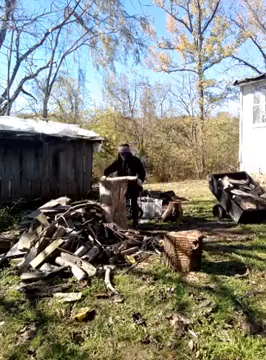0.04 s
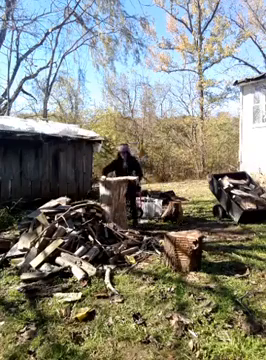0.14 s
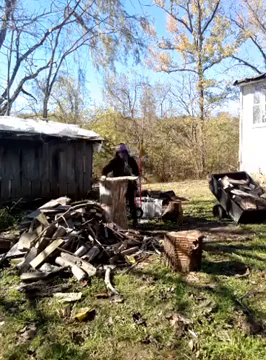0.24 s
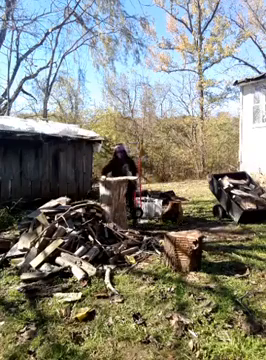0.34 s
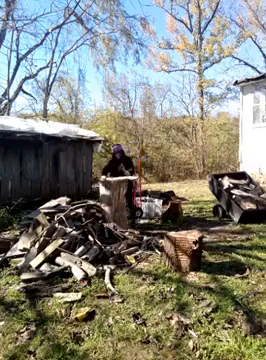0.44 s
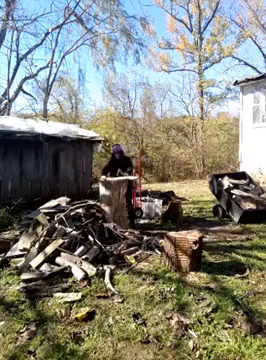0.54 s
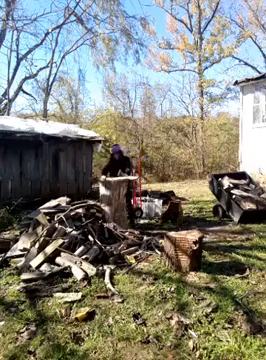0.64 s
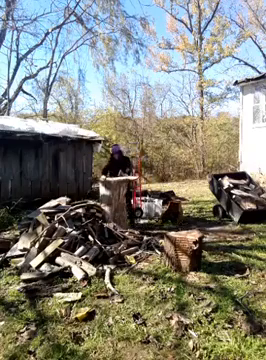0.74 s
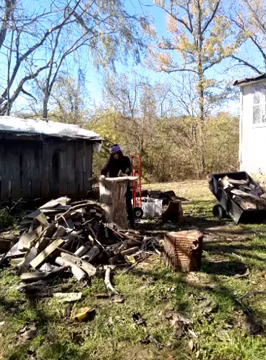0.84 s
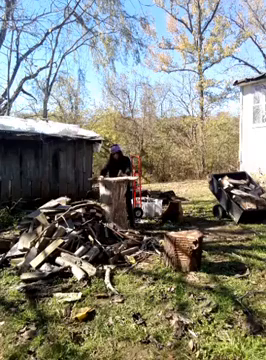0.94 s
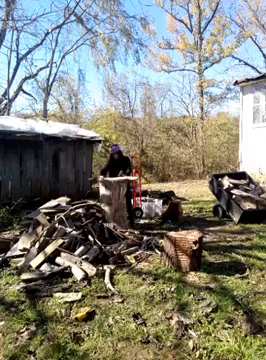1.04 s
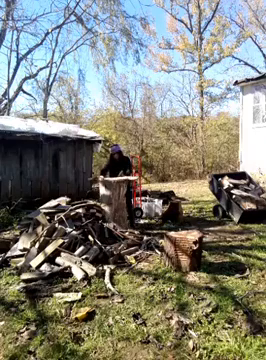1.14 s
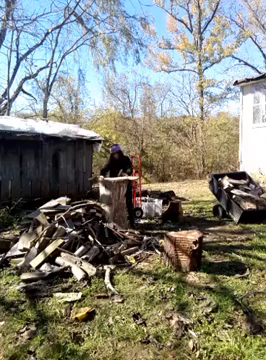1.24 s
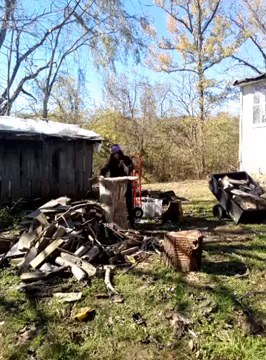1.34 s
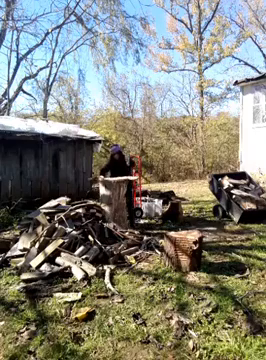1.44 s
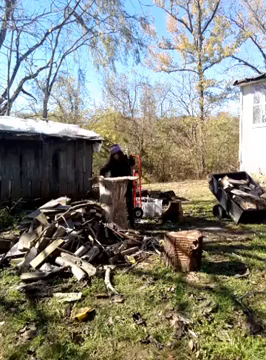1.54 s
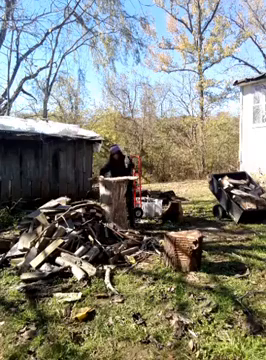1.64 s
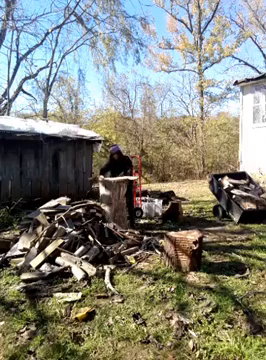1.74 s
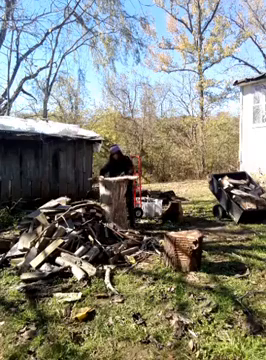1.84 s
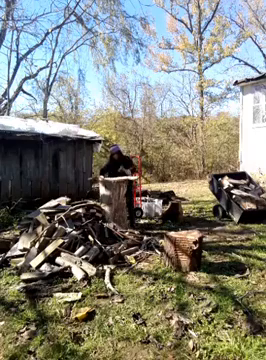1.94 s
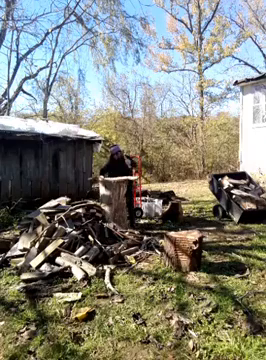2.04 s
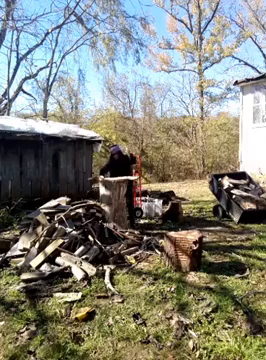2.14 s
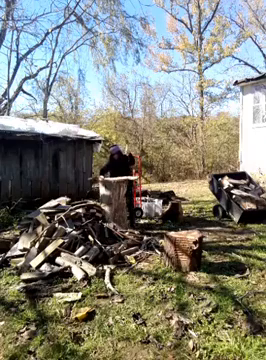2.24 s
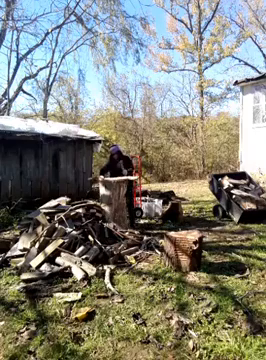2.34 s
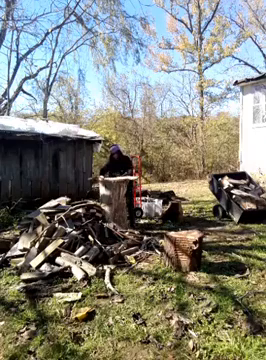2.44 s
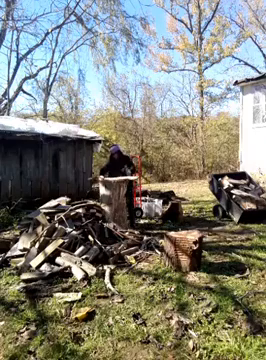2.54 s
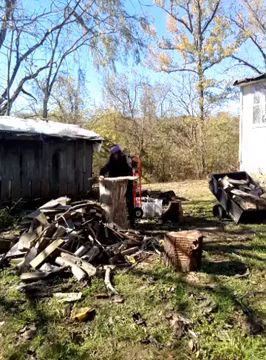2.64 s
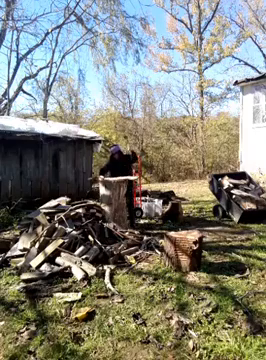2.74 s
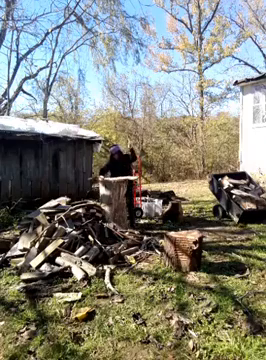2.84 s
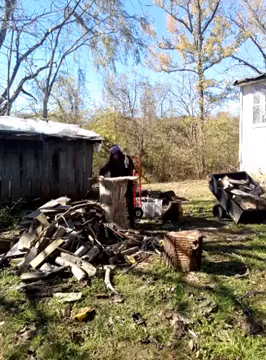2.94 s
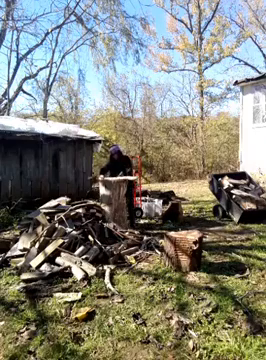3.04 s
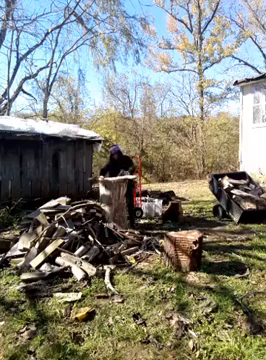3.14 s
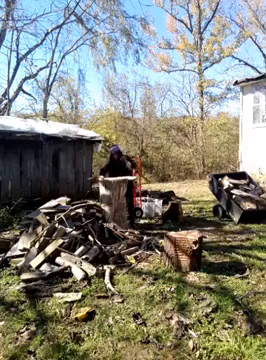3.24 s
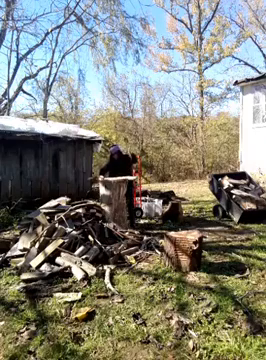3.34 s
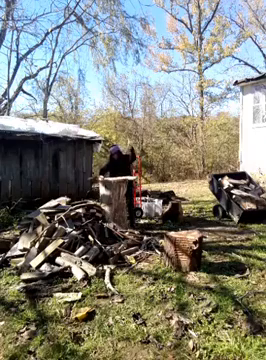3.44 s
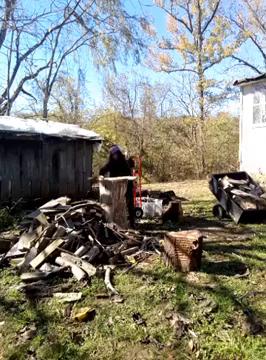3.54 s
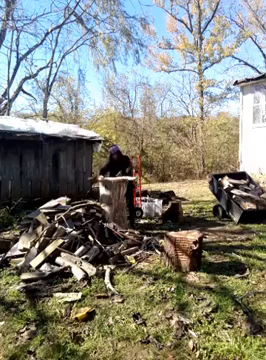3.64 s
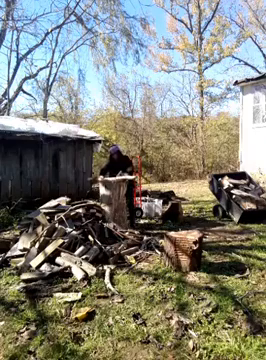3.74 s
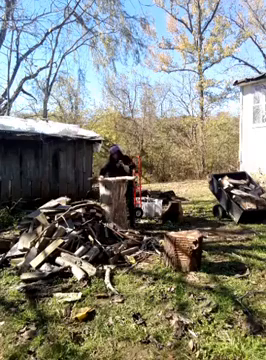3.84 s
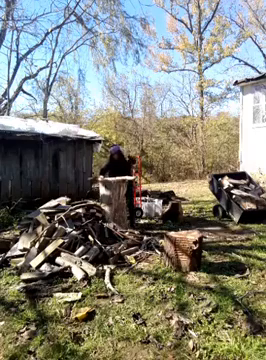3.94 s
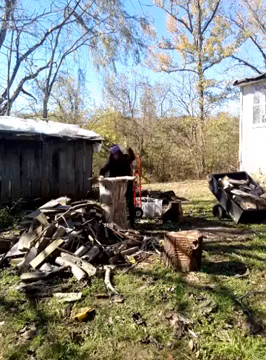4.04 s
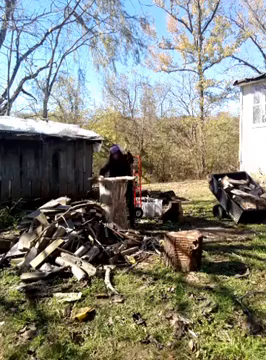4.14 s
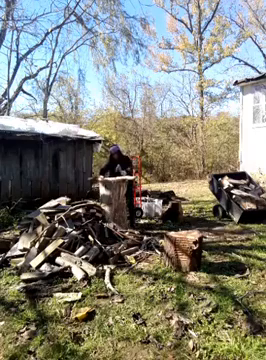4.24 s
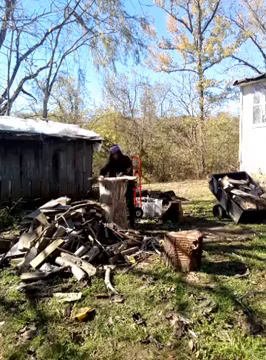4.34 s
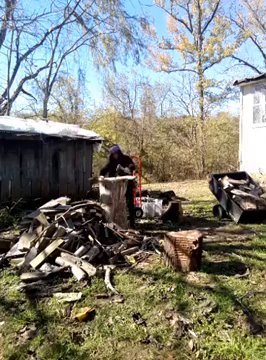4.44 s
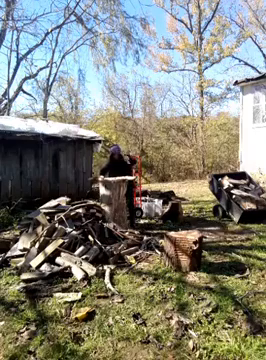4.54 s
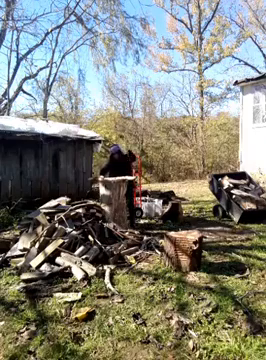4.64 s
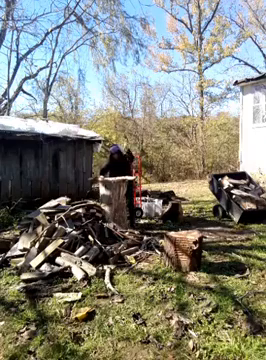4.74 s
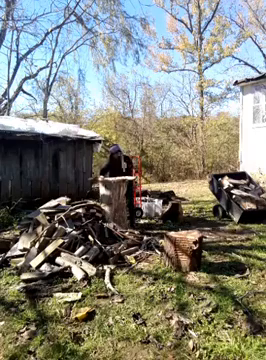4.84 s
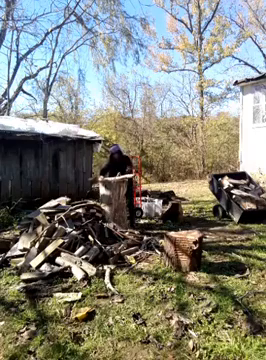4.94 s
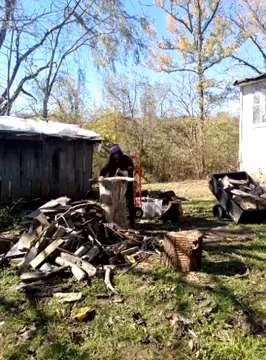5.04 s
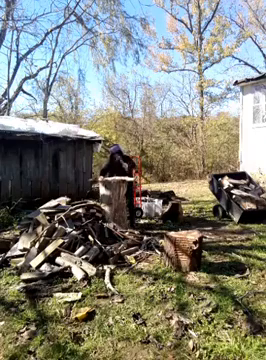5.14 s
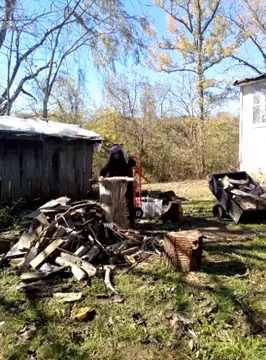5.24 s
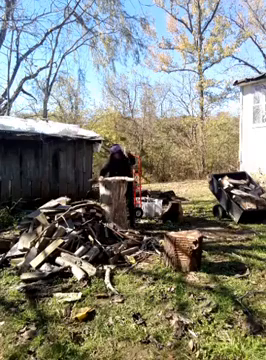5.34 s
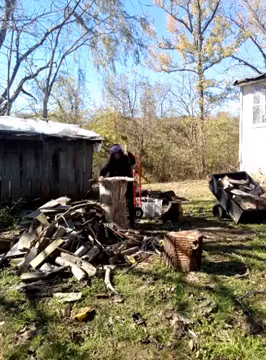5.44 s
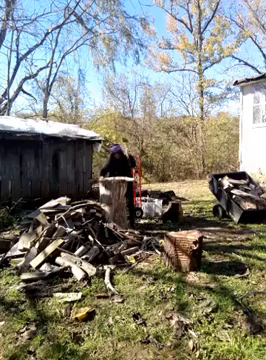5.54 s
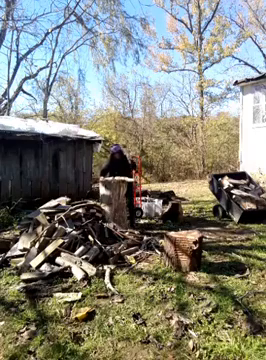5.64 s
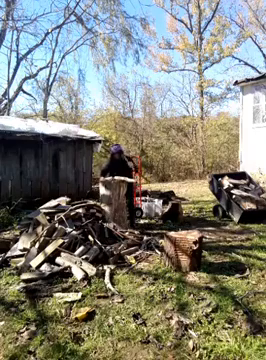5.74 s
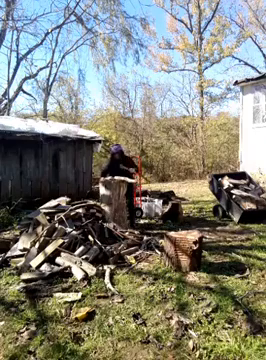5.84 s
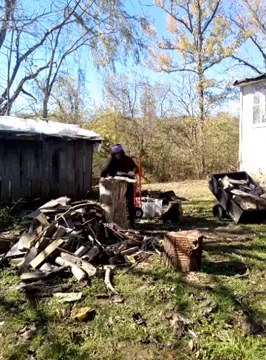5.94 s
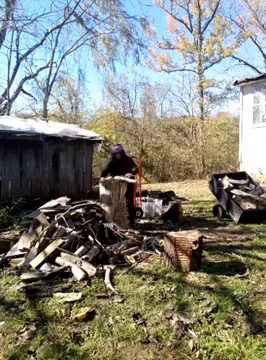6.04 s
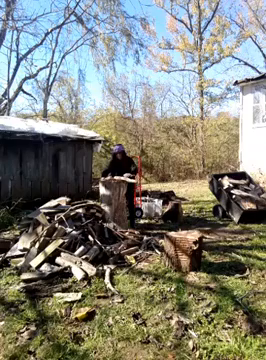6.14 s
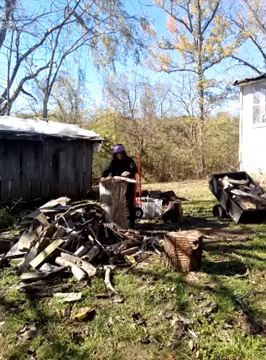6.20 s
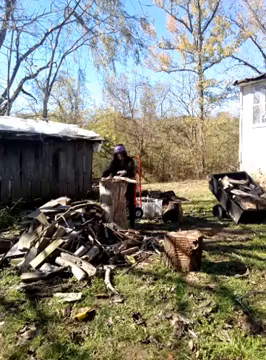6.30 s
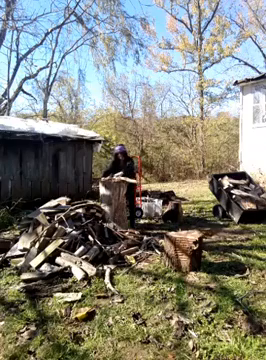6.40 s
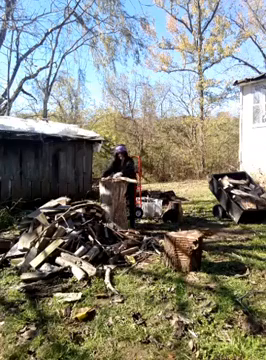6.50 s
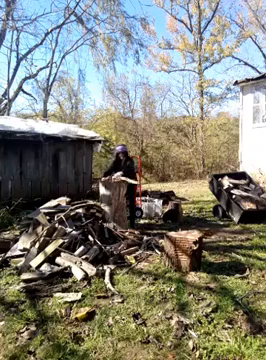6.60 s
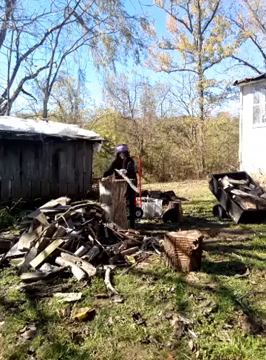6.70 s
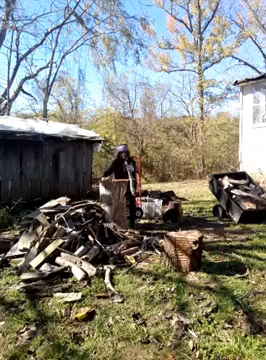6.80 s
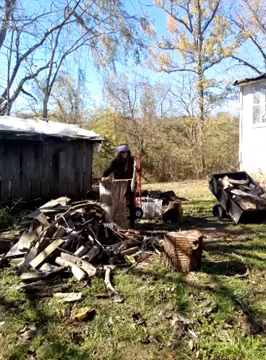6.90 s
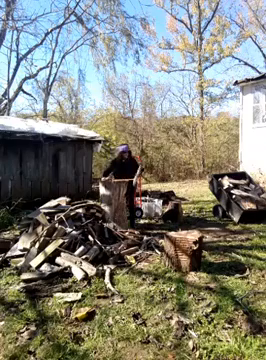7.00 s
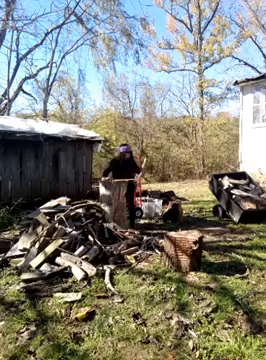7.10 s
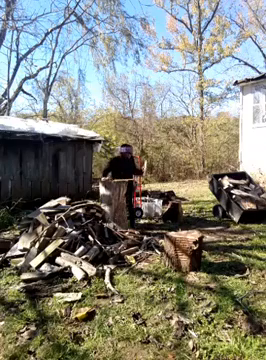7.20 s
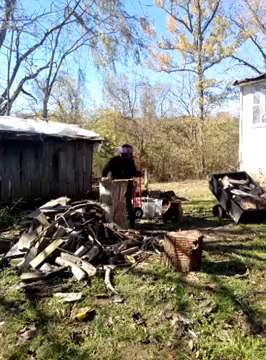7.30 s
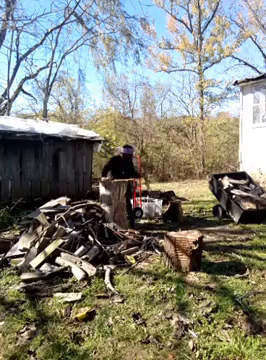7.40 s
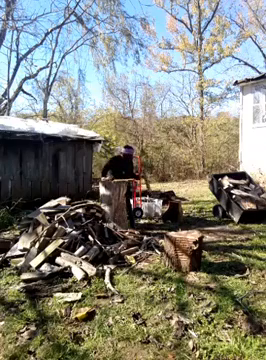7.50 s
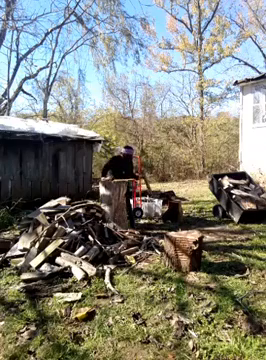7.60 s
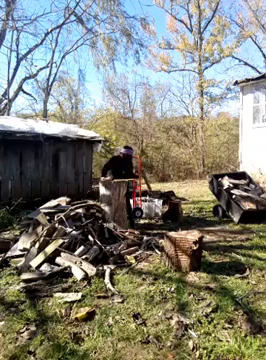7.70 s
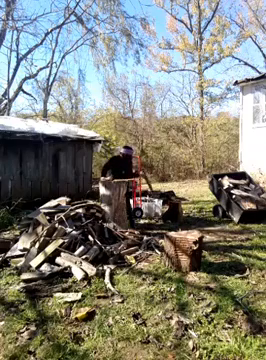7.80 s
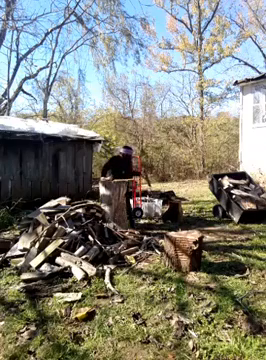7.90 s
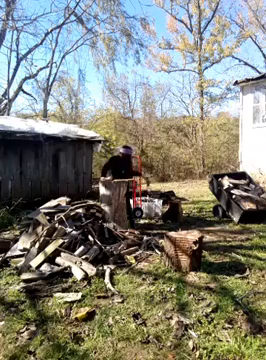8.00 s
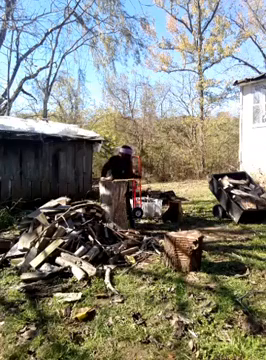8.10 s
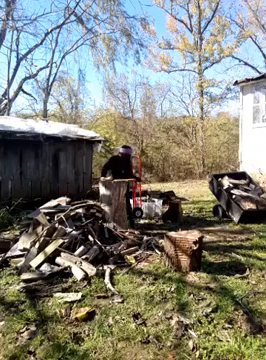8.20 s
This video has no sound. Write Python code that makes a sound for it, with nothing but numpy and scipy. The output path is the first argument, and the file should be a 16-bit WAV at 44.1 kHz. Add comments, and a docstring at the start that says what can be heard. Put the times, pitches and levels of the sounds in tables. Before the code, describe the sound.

Quiet outdoor air, a faint rumble and hiss, runs throughout. In the first second feet and hands scuff softly, and a stick is set on a wooden block with a few faint knocks around 0.7 seconds. An axe then chops it six times at an even pace, at about 1.9, 2.6, 3.2, 3.8, 4.5 and 5.1 seconds, the third being the hardest. Each chop is a sharp, short crack of tearing fibres with a woody thump and a tiny steel tick. Nearby buildings give a brief echo, and distant trees a faint longer one. Between 6.3 and 6.6 seconds the split piece comes loose with about four lighter, hollow knocks. Soft scuffs follow near 6.8 seconds and again from 7.6 to 8.1. Everything is heard from several metres away in a yard, through a small, boxy-sounding microphone.

```python
"""An axe splits a stick of kindling in six chops, several metres away in a yard; the wood knocks loose.
Each blow thumps the chopping block, rings the stick and the axe head, and tears fibres.
The shed and house echo it, then the far trees. Feet and hands scuff softly before and after.
A small, boxy-sounding microphone hears it all over quiet outdoor air."""
import sys
import numpy as np
from scipy import signal
from scipy.fft import rfft, irfft
from scipy.io import wavfile
from scipy.ndimage import uniform_filter1d

SR = 44100
rng = np.random.default_rng(int(sys.argv[2]) if len(sys.argv) > 2 else 0)


def digitize_waveform(pressure):
    """Quantize a signal to 16-bit integers and store it at the path in sys.argv[1].

    Rows of a 2-D input are taken as channels; values are limited to [-1, 1].
    """
    field = np.atleast_2d(pressure).T
    bounded = np.clip(field, -1, 1)
    quanta = np.round(bounded * 32767).astype(np.int16)
    wavfile.write(sys.argv[1], SR, quanta)


N = 364266

# tone of the outdoor rumble and hiss: pitch_hz, level_db
AIR_TONE = [(25, -26.5), (45, -14), (65, -5), (85, 1.5), (130, -4), (250, -7), (450, -12.5), (760, -14.5),
            (1100, -20.5), (2300, -19.5), (3600, -17), (5200, -23.5), (8000, -23.5), (13500, -22)]
# the background sinks as the recorder turns its gain down for the chops: time_s, level_db
BACKGROUND_LEVELS = [(0, -68), (.5, -70.5), (2.9, -70.5), (5.8, -76.5), (6.75, -71)]
# shuffling feet and wood sliding in the hands: start_s, length_s, level_db
SCUFFS = [(0.147, 0.13, -63.5), (0.272, 0.067, -73.5), (0.625, 0.23, -69), (6.769, 0.12, -70.5),
          (7.57, 0.075, -70.5), (7.732, .06, -78), (8.06, 0.038, -74)]
# tone of that rubbing: pitch_hz, level_db
SCUFF_TONE = [(60, -16), (200, 5.5), (600, -4), (1500, -11.5), (2800, -10.5), (5000, -9.5), (8000, -17),
              (14000, -18.5)]
# echoes off the ground, then hard surfaces near the block: delay_s, level_db
NEAR_ECHOES = [(.00139, -15.5), (.0222, -12), (0.0257, -16.5)]
# echoes scattered by shed, house and woodpile: pitch_hz, level_db, fade_s (time to fall 60 dB)
YARD_SCATTER = [(70, 5, 0.4), (170, 6.5, 0.16), (346, -6.5, 0.25), (750, -8, .26), (1407.4, -7.5, 0.23),
                (2080, -5, .28), (2940, -12.5, .29), (6000, -4, 0.29), (13000, 1.5, 0.11)]
# tone of the echo from the far trees: pitch_hz, level_db
TREE_TONE = [(100, -4), (400, -10.5), (800, 0.5), (1400, -6.5), (3200, -6.5), (6000, -12), (13000, -27)]
# the block's dull knock: pitch_ratio (times block_hz), fade_s, level_db
BLOCK_NOTES = [(.82, 0.017, -7), (1, 0.019, -5), (1.12, .018, -12)]
# the whole stump thumping on the ground: pitch_hz, fade_s, level_db
STUMP_NOTES = [(73.5, .06, -12), (162, 0.067, -2.5), (208, 0.055, 2), (276, 0.056, -1.5)]
# the ringing stick: pitch_hz, fade_s, level_db
STICK_NOTES = [(1442, .026, -2), (1374, 0.022, -10), (2190, 0.025, -12), (2934, 0.017, -9.5),
               (3380, .025, -13.5), (4580, 0.017, -27.5), (5065, 0.018, -23)]
# the loose split piece: pitch_hz, fade_s, level_db
PIECE_NOTES = [(269, 0.064, -14), (464, 0.051, -10.5), (881, 0.013, 4), (1040, 0.013, -29),
               (2276, 0.066, -12), (2880, 0.03, -8)]
# the click of wood touching wood: pitch_hz, level_db
CLICK_TONE = [(60, -17.5), (250, 1), (500, 9.5), (1100, -3), (1850, -12), (3300, 1.5), (5500, -10.5),
              (8500, -26), (14000, -36.5)]
# wood handled on the block: start_s, force_db, block_hz, hardness_db
KNOCKS = [ (.661, -40, 442, -16), (.738, -35.5, 507, -6.5), (.7451, -35, 550, 1), (2.418, -44, 843, 3),
          (3.181, -48.5, 800, 3), (6.327, -26.5, 838, -10.5), (6.4066, -30.5, 736, 4.6),
          (6.526, -34.5, 700, 1), (6.612, -44, 620, -7)]
# tone of tearing fibres: pitch_hz, level_db
TEAR_TONE = [(25, -36.5), (70, -23.5), (200, -13), (300, -19), (400, -19), (560, 1), (800, 0), (1150, -6.5),
             (1850, -10), (2300, -5.5), (3000, 2.5), (4200, -1), (6000, -13), (8000, -14.5), (11000, -17),
             (14500, -22.5)]
# the steel axe head, damped by the wood: pitch_hz, fade_s, level_db
AXE_NOTES = [(6660, .017, -1), (8070, 0.0025, -14.5), (9670, 0.015, -6)]
# axe chops: start_s, force_db, block_hz, stick_db, tear_db, bite_db, bite_early_s
# (the stick, tear and bite levels are added to force_db)
CHOPS = [ (1.9298, -12.5, 635, -22, -14, 4.5, 0.0027), (2.577, -6, 596, -8, -13.5, -13, 0.0023),
         (3.212, -3.5, 715, -14.5, -21, -29, 0.0016), (3.8398, -12.5, 745, -15, -14, -4, 0.0049),
         (4.4675, -8, 735, -13.5, -5.5, -20, .0035), (5.0993, -8, 761, -11, -16.5, -11, 0.0027)]
# resonances of the microphone's opening and case: pitch_hz, width_hz, boost_db
MIC_RESONANCES = [(769, 170, 15.5), (1403, 110, 7.5), (2104, 96, 5), (3190, 68, 5), (8900, 870, -9)]

TIME = np.arange(SR) / SR  # one second in the life of a blow
LEAD_S = .01  # room for a crack to swell before the contact
AGE = TIME[:SR // 5] - LEAD_S  # seconds since contact


def gain(db):
    """Turn decibels into a number to multiply by."""
    return 10 ** (np.asarray(db) / 20)


def colour(x, tone):
    """Make a sound's pitches louder or softer to follow a tone table."""
    hz, db = np.transpose(tone)
    freqs = np.maximum(np.fft.rfftfreq(len(x), 1 / SR), 1)
    return irfft(rfft(x) * gain(np.interp(np.log(freqs), np.log(hz), db)), len(x))


def noise(tone, size):
    """Noise with the given tone and an average strength (rms) of 1."""
    x = colour(rng.standard_normal(size), tone)
    return x / x.std()


def flicker(size, step, depth_db):
    """A gain that wanders to a new random level every step samples."""
    samples = np.arange(size)
    corners = samples[::step]
    return gain(depth_db * np.interp(samples, corners, rng.standard_normal(len(corners))))


def fade(t, fade_s):
    """Die away by 60 dB in fade_s seconds."""
    return np.exp(-np.log(1000) * np.maximum(t, 0) / fade_s)


def add(out, x, start_s):
    """Mix x into out from start_s on."""
    i = max(int(start_s * SR), 0)
    out[i:i + len(x)] += x[:max(len(out) - i, 0)]


def background():
    """Rumble and hiss sink on a set curve as the recorder turns its gain down, then recover."""
    level_db = np.interp(np.arange(N) / SR, *np.transpose(BACKGROUND_LEVELS))
    return noise(AIR_TONE, N) * gain(level_db)


def shuffling():
    """Feet and hands rub in soft, grainy swells."""
    out = np.zeros(N)
    for start_s, length_s, db in SCUFFS:
        size = int(length_s * SR)
        swell = np.hanning(size) * flicker(size, step=150, depth_db=3)
        add(out, gain(db) * noise(SCUFF_TONE, SR)[:size] * swell, start_s)
    return out


def tree_echo(level_db=-30, rise_s=.24, slap_s=.281, slap_db=-15):
    """Far trees send back a long, faint, patchy wash; one distant surface adds a distinct slap."""
    wash = flicker(SR, step=400, depth_db=2) * rng.standard_normal(SR)
    wash *= fade(TIME, fade_s=1.35) * np.minimum(TIME / rise_s, 1)
    wash /= np.linalg.norm(wash)
    wash[int(slap_s * SR)] += gain(slap_db)
    return gain(level_db) * colour(wash, TREE_TONE)


def yard_echo(first_wall_s=.014, early_db=-6):
    """The paths a blow takes to the microphone: straight, off nearby surfaces and off the trees."""
    hz, db, fade_s = np.transpose(YARD_SCATTER)
    log_freqs = np.log(np.maximum(np.fft.rfftfreq(SR, 1 / SR), 1))
    scatter = rfft(rng.standard_normal(SR))
    # only the ground and the woodpile answer before the first wall does
    onset = np.where(TIME < first_wall_s, gain(early_db) * np.minimum(TIME / .006, 1), 1)
    echo = tree_echo()
    for k, weights in enumerate(np.eye(len(hz))):
        band = irfft(scatter * np.interp(log_freqs, np.log(hz), weights), SR)
        shape = onset * fade(TIME - first_wall_s, fade_s[k])
        echo += gain(db[k]) * band * shape / np.linalg.norm(shape)
    echo[0] += 1  # the straight path
    for delay_s, echo_db in NEAR_ECHOES:
        echo[int(delay_s * SR)] += gain(echo_db)
    return echo


def ring(notes, contact_s, pitch=1):
    """A struck object's notes build up during the contact, then fade; we hear how fast it moves."""
    t = np.maximum(AGE, 0)
    swing = np.zeros(len(t))
    for hz, fade_s, db in notes:
        turn_rate = 2 * np.pi * hz * pitch
        swing += gain(db) * np.sin(turn_rate * t) * fade(t, fade_s) / turn_rate
    build_up = (1 - np.exp(-t / contact_s)) * np.tanh(2 * t / contact_s)
    return SR * np.diff(build_up * swing, prepend=0)


def crack(tone, rise_s, fade_s):
    """A ragged crack that swells as the contact bites and dies as the wood gives."""
    grains = flicker(len(AGE), step=16, depth_db=3)
    shape = np.exp(np.minimum(AGE, 0) / rise_s) * fade(AGE, fade_s)
    spectrum = rfft(rng.standard_normal(len(AGE)) * grains * shape)
    # smooth the noise burst's spectrum so every crack of a kind has the same tone
    spectrum /= np.sqrt(uniform_filter1d(np.abs(spectrum) ** 2, size=120))
    snaps = colour(irfft(spectrum, len(AGE)), tone)
    return snaps * np.linalg.norm(shape) / np.linalg.norm(snaps)


def struck_wood(block_hz, stick_db, stump_db, square_hz=490, db_per_octave=-15):
    """One contact rings the block, the stump and the stick."""
    # low-pitched contacts land squarely and shake the stump, high ones glance off
    square_db = db_per_octave * np.log2(block_hz / square_hz)
    return (ring(BLOCK_NOTES, contact_s=.0019, pitch=block_hz)
            + gain(stump_db + square_db) * ring(STUMP_NOTES, contact_s=.0024)
            + gain(stick_db) * ring(STICK_NOTES, contact_s=.0016))


def handling(free_s=6, free_stick_db=-6, held_stick_db=-15, click_db=-12.5, piece_db=-8):
    """The stick is set down and shifted; at last the split piece drops and bounces."""
    out = np.zeros(N)
    for start_s, force_db, block_hz, hardness_db in KNOCKS:
        # a hand damps the stick until the split piece comes free and rings too
        free = start_s > free_s
        stick_db = hardness_db + (free_stick_db if free else held_stick_db)
        knock = struck_wood(block_hz, stick_db, stump_db=-12.5)
        knock += gain(hardness_db + click_db) * crack(CLICK_TONE, rise_s=.00047, fade_s=.013)
        if free:
            knock += gain(piece_db) * ring(PIECE_NOTES, contact_s=.0013)
        add(out, signal.fftconvolve(gain(force_db) * knock, yard_echo()), start_s - LEAD_S)
    return out


def resonance(x, hz, width_hz, boost_db):
    """What to add to x to boost (or cut) it around one pitch."""
    return (gain(boost_db) - 1) * signal.lfilter(*signal.iirpeak(hz, hz / width_hz, fs=SR), x)


def tearing(db):
    """Fibres snap as the wood parts, coloured by the stick's middle notes."""
    snaps = crack(TEAR_TONE, rise_s=.00074, fade_s=.012)
    woody = snaps + sum(resonance(snaps, hz, width_hz=190, boost_db=4) for hz, _, _ in STICK_NOTES[2:5])
    return gain(db) * woody * snaps.std() / woody.std()


def chopping(bite_pitch_ratio=.83, axe_db=1, grip_db_per_chop=-3, split_s=3.2232, split_db=-27.5):
    """Each axe chop bites, then drives home, and echoes its own way round the yard."""
    out = np.zeros(N)
    # the axe's flat side beams its ring forward, so little of it reaches the walls
    spill = gain(-10)
    for k, (start_s, force_db, block_hz, stick_db, tear_db, bite_db, bite_early_s) in enumerate(CHOPS):
        echo = yard_echo()
        # the head rings with the tearing, less with each chop as the split grips it
        head = gain(tear_db + axe_db + k * grip_db_per_chop) * ring(AXE_NOTES, contact_s=.00078)
        bite = (start_s - bite_early_s, force_db + bite_db, block_hz * bite_pitch_ratio)
        drive = (start_s, force_db, block_hz)
        for at_s, db, hz in (bite, drive):
            wood = gain(db) * (struck_wood(hz, stick_db, stump_db=-21.5) + tearing(tear_db))
            steel = gain(db) * head
            add(out, signal.fftconvolve(wood + spill * steel, echo), at_s - LEAD_S)
            add(out, (1 - spill) * steel, at_s - LEAD_S)
    # the split runs on along the grain just after the hardest chop
    add(out, signal.fftconvolve(tearing(split_db), yard_echo()), split_s - LEAD_S)
    return out


def scene():
    """Everything in the yard, mixed into one channel."""
    return (chopping() + handling() + shuffling() + background())[None]


def record(dry, top_hz=14350):
    """The microphone's opening and case colour everything; the highest treble is cut off."""
    for hz, width_hz, boost_db in MIC_RESONANCES:
        dry = dry + resonance(dry, hz, width_hz, boost_db)
    treble_cut = signal.ellip(10, .2, 70, top_hz, fs=SR, output="sos")
    return signal.sosfilt(treble_cut, dry)


dry = scene()
out = record(dry)
digitize_waveform(out)
```